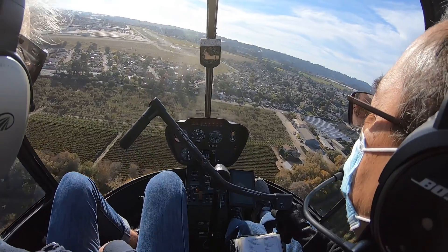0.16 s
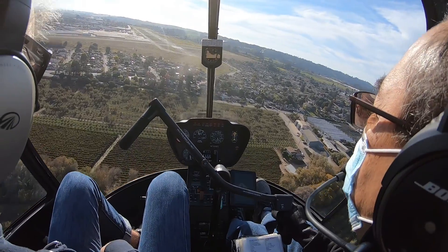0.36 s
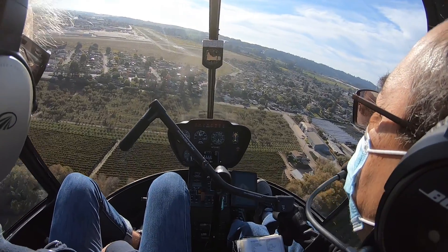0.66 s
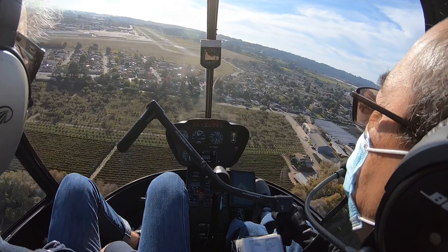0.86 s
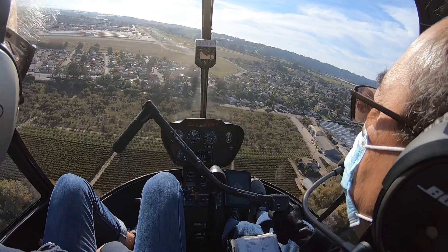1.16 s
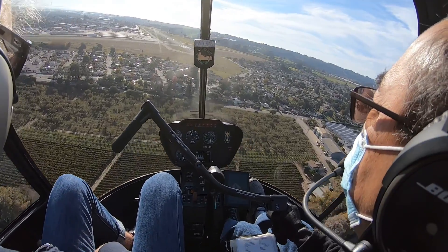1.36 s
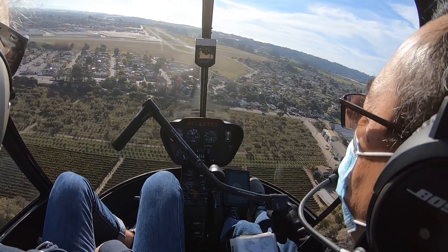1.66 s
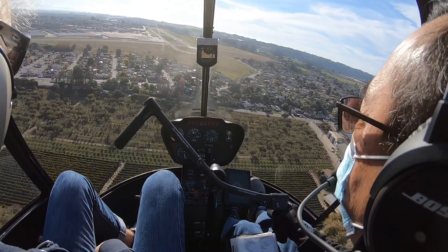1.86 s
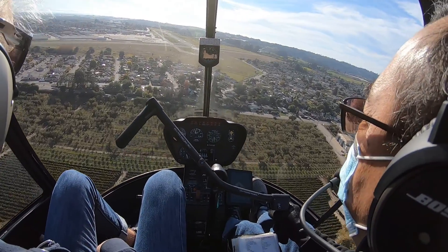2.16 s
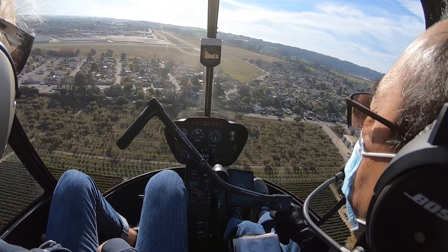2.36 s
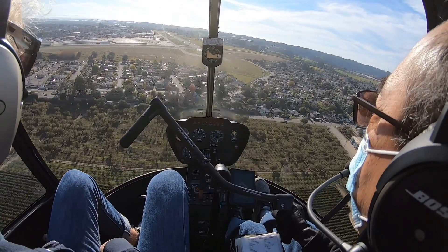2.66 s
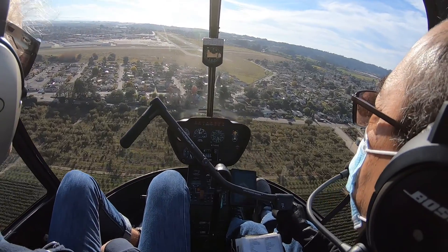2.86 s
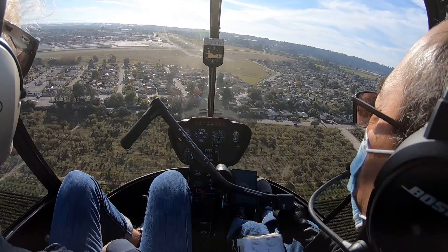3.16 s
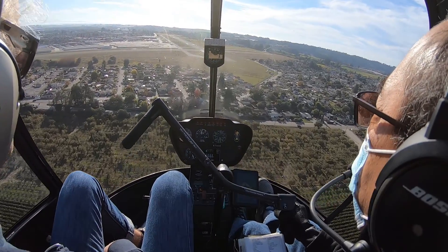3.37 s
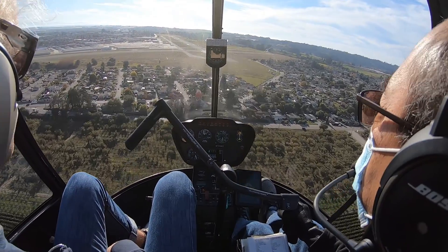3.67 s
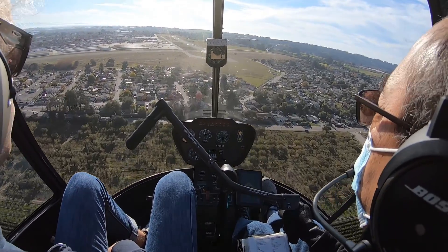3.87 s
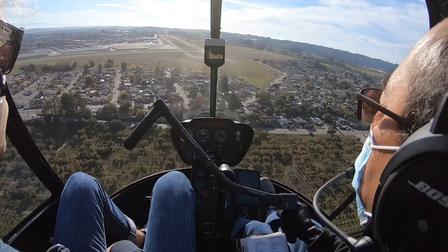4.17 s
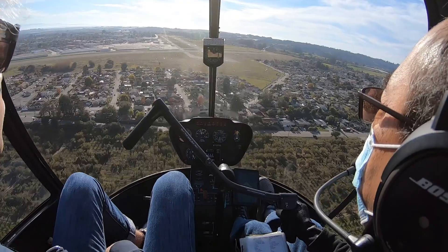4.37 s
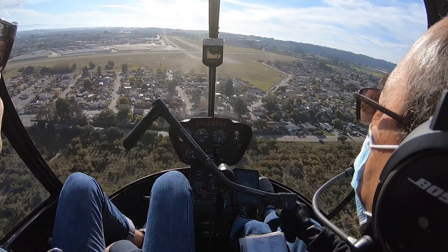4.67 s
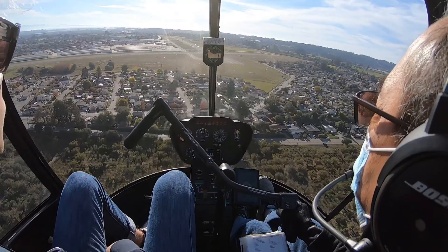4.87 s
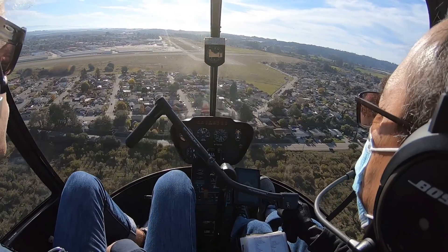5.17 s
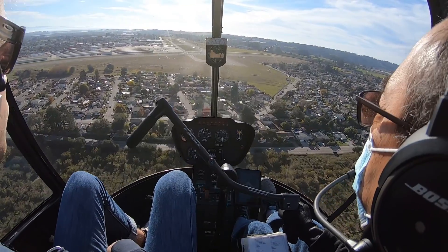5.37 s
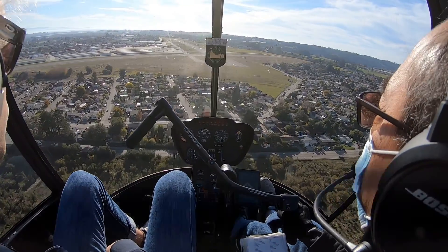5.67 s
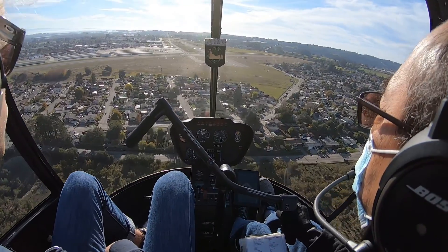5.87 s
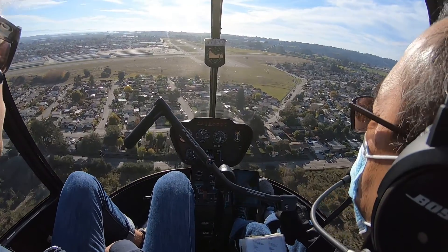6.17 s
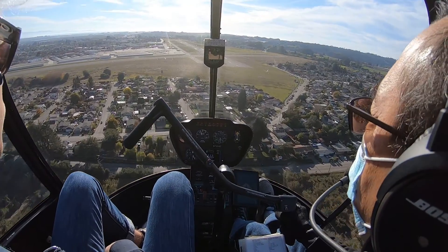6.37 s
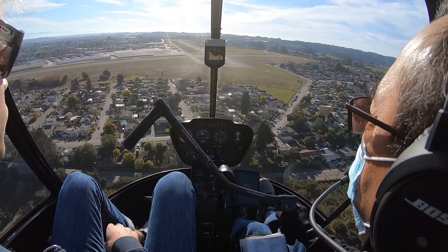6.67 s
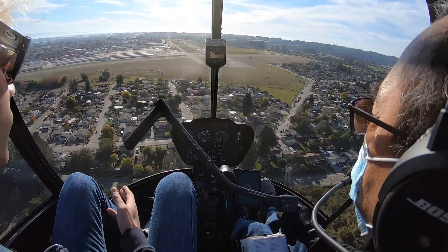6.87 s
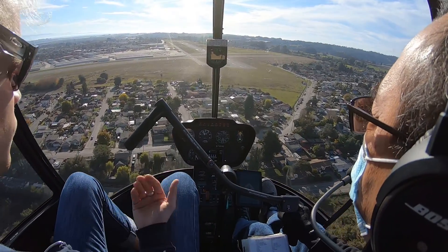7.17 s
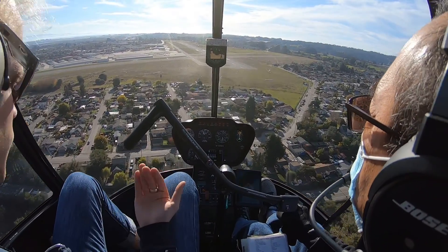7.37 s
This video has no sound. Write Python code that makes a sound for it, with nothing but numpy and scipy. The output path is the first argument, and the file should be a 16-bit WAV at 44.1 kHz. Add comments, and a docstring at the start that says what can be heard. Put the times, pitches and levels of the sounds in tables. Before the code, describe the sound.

A rapid, regular helicopter chop comes through a headset intercom: uneven snapping blade slaps, each with a short cabin reverberation, over coloured air rush and buzzing engine and tail rotor hum. It begins boomy and hollow, briefly softens to rushing air, then resumes clearer and brighter with occasional extra-hard thumping cracks. The pulsing continues steadily to the end, mid-heavy and clipped, in the left channel with the right practically silent.

```python
"""Two-bladed helicopter through a headset

Inside a small piston helicopter rolling out of a turn, heard through the headset intercom.
Each blade slaps the wake of the other, made of short pulses of uneven strength that echo round the cabin.
Blade swish and cabin rush are coloured noise; engine and tail rotor hum are sums of sine waves.
A second microphone is open at first. The left channel carries it all; the right has a very faint noise
floor and a trace of the left."""
import sys
import numpy as np
from scipy import signal
from scipy.fft import rfft, irfft, next_fast_len
from scipy.io import wavfile
from scipy.ndimage import map_coordinates

SR = 44100
rng = np.random.default_rng(int(sys.argv[2]) if len(sys.argv) > 2 else 0)


def dump_mix(stems):
    """Bounce the given channels to the path in sys.argv[1] as a 16-bit WAV at rate SR."""
    frames = np.atleast_2d(stems).T  # one column per channel
    limited = np.clip(frames, -1, 1)  # hard clip at full scale
    pcm = np.round(limited * 32767).astype(np.int16)
    wavfile.write(sys.argv[1], SR, pcm)


N = 331746

# speed of the air round the cabin, as the rush it makes before each sound's own offset: t/s, level/dB
AIR_RUSH = [(0, -34), (0.45, -33), (1.0, -34.5), (1.4, -28), (1.85, -30.5), (2.3, -29), (2.55, -33.5),
            (3.1, -33.5), (3.9, -32.5), (6.9, -32), (7.25, -30), (7.5, -31)]
# how hard the blades meet the wake, which they clear briefly as the turn ends:
# t/s, slap level/dB, lead of the second blade over the first/dB
WAKE_STRENGTH = [(0, -1.5, 4), (0.35, -2.5, 8), (0.65, -1.5, 0.5), (1.05, -2, 0), (1.27, -23, -3),
                 (1.45, -23, -5), (1.65, -1.5, -0.5), (2.2, -3, -1.5), (2.5, 0, 0.5), (3.35, -2, 4.5),
                 (4.3, 0, 3.5), (4.55, -3, 1), (5.1, -1, 1.5), (5.6, -3, 11.5), (5.9, -2.5, 0),
                 (6.2, -1, 9), (7.05, -3, -1), (7.5, -1, 1)]
# colour of the brighter cabin echoes: f/Hz, relative level per Hz/dB
ECHO_COLOUR = [(120, -39), (300, -30.5), (700, -11), (1200, -7), (1900, -0.5), (2700, -2), (4000, -16.5),
               (5500, -29), (7300, -37), (15000, -40)]


def amp(db):
    """Turn decibels into a gain."""
    return 10 ** (np.asarray(db) / 20)


def unit(x):
    """Scale a sound to rms 1."""
    return x / np.sqrt(np.mean(x ** 2) + 1e-20)


def curve(rows, at=None, axis=1):
    """Read one column of a table at the given times (default: every sample)."""
    rows = np.asarray(rows, float)
    times = np.arange(N) / SR if at is None else at
    return np.interp(times, rows[:, 0], rows[:, axis])


def gains(points, size):
    """Turn a table of frequencies and decibels into a gain for each FFT frequency."""
    hz, db = np.transpose(points)
    grid_hz = np.fft.rfftfreq(size, 1 / SR)
    return amp(np.interp(np.log(grid_hz + 1), np.log(hz), db))


def noise(points):
    """Random noise of rms 1, coloured by filtering its spectrum."""
    size = next_fast_len(N + 8192)
    spectrum = rfft(rng.standard_normal(size)) * gains(points, size)
    return unit(irfft(spectrum, size)[:N])


def wobble(rate):
    """A smooth random curve through `rate` random points a second."""
    points = rng.standard_normal(int(N * rate / SR) + 4)
    return map_coordinates(points, [np.arange(N) * rate / SR])


def pulses(times, sizes, points, skew=1, size=2048, count=256):
    """Pressure pulses of given spectrum and peak sizes; skew 1 rings only afterwards, 0 is symmetric."""
    # weighting the two halves of the cepstrum (spectrum of the log spectrum) sets where the pulse rings
    cepstrum = irfft(np.log(gains(points, size)))
    cepstrum[1:size // 2] *= 1 + skew
    cepstrum[size // 2 + 1:] *= 1 - skew
    # leave `count` samples of room ahead of the peak
    shape = np.roll(irfft(np.exp(rfft(cepstrum))), count)
    index = np.clip(np.round(np.ravel(times) * SR).astype(int), 0, N)
    train = np.bincount(index, np.ravel(sizes), N + 1)[:N]
    return signal.fftconvolve(train, shape / np.abs(shape).max())[count:count + N]


def rotor_phase():
    """Blade passes counted since the first one, for every sample, as the governor lets the speed drift."""
    # how far the blades fall behind steady turning: t/s, lag/ms
    blade_lag = [(0, -0.3), (0.45, -1.95), (1.3, -1.85), (1.65, 0.4), (2.3, 2.8), (2.81, 3.75), (3.3, 2.8),
                 (4.5, -1.25), (5.8, -1.3), (6.8, -0.8), (7.5, 2.6)]
    blade_hz, first_pass_s = 17.55, .0166
    return (np.arange(N) / SR - first_pass_s - curve(blade_lag) / 1000) * blade_hz


def blade_passes(phase, scatter_db=1.23):
    """Time and strength of each slap; the two blades differ in strength and are not quite evenly spaced."""
    # single passes that slap harder, or in one case softer: t/s, extra slap level/dB
    odd_slaps = [(0.87, 2), (2.41, 5), (2.93, 1.5), (3.27, 2.5), (3.72, 6), (3.84, -1.5), (4.40, 0.5),
                 (4.75, 6.5), (5.31, 2), (5.66, 1.5), (5.77, 4), (6.11, 3), (6.91, 3.5)]
    number = np.arange(int(phase[-1]) + 1)
    second_blade = number % 2 == 1
    even_times = np.interp(number, phase, np.arange(N) / SR)
    times = even_times + np.where(second_blade, .0002, -.00054)
    # share the lead equally: half up for the second blade, half down for the first
    lead_db = np.where(second_blade, .5, -.5) * curve(WAKE_STRENGTH, times, axis=2)
    db = curve(WAKE_STRENGTH, times) + lead_db
    for s, extra_db in odd_slaps:
        nearest = np.argmin(np.abs(times - s))
        db[nearest] += extra_db
    return times, amp(db + scatter_db * rng.standard_normal(len(times)))


def cabin_rush(rush_db=5.5):
    """Airflow and machinery noise in the cabin, as noise that follows the speed of the air."""
    # colour of the cabin noise: f/Hz, relative level per Hz/dB
    cabin_colour = [(50, -21), (120, -34), (200, -13), (330, -13), (560, -4), (760, -0.5), (1200, -1),
                    (1900, 3), (3000, -2.5), (4000, -8), (5500, -15), (7500, -29.5), (10000, -32),
                    (15000, -52)]
    return amp(curve(AIR_RUSH) + rush_db) * noise(cabin_colour)


def hum(turns, orders, waver=0.31, drift=0.43):
    """Harmonics of a shaft geared to the rotor, each wavering a little in level and phase."""
    out = np.zeros(N)
    for order, db in orders:
        angle = 2 * np.pi * (round(order) * turns + rng.random()) + drift * wobble(7.7)
        level = amp(db) * (1 + waver * np.tanh(wobble(7.1)))
        out += level * np.sqrt(2) * np.sin(angle)
    return out


def machinery(phase, tail_db=0):
    """Engine and tail rotor hum together, both geared to the main rotor."""
    # engine hum before the mix: multiple of the crank rate, rms level/dB
    engine_orders = [(4, -60.5), (5, -62.5), (6, -49), (7, -53.5), (8, -51), (10, -56), (11, -65),
                     (12, -51)]
    # tail rotor hum before the mix: multiple of the tail blade rate, rms level/dB
    tail_orders = [(1, -78), (2, -53), (3, -45.5), (4, -50), (5, -48)]
    crank_ratio, tail_ratio = 2.506, 6.42  # crank turns and tail blade passes for each main blade pass
    return hum(crank_ratio * phase, engine_orders) + amp(tail_db) * hum(tail_ratio * phase, tail_orders)


def second_microphone(phase, hum_db=-7):
    """Another headset adds boomier cabin noise and machinery hum until its squelch shuts."""
    # cabin noise in this microphone: t/s, level/dB
    open_level = [(0, -28), (1.1, -29), (1.35, -27), (1.6, -23), (1.625, -70), (1.7, -120)]
    # colour of that noise: f/Hz, relative level per Hz/dB
    boomy_colour = [(60, -44), (125, -28), (175, -7), (250, 1), (295, -4.5), (355, 6.5), (550, -7),
                    (1100, 0), (1800, -18), (3100, -6), (4100, -7), (5500, -24), (9000, -43)]
    pickup = noise(boomy_colour) + amp(hum_db) * unit(machinery(phase, tail_db=-4.0))
    return amp(curve(open_level)) * pickup


def swish(phase, depth_db=22, width=0.18, late=0.12, gust_db=0.18, grain_db=1.06):
    """Turbulence on the advancing blade swells and fades once a pass, and rises with the rush of air."""
    # colour of the swish: f/Hz, relative level per Hz/dB
    swish_colour = [(300, -23.5), (800, 1), (1500, 4), (2500, 3.5), (3500, 1), (5000, -8.5), (7200, -11),
                    (8500, -18), (12000, -19.5), (15500, -41)]
    steady_rush_db, swish_db, growth = -32, -19.5, 1  # growth: dB of swish for each dB of rush
    # width and late are fractions of a blade pass
    offset = (phase - late + .5) % 1 - .5
    swell_db = depth_db * (np.exp(-.5 * (offset / width) ** 2) - 1)
    eddies_db = gust_db * wobble(18) + grain_db * wobble(300)
    flow_db = growth * (curve(AIR_RUSH) - steady_rush_db)
    return amp(swish_db + flow_db + swell_db + eddies_db) * noise(swish_colour)


def echoes(times, strength, paths, colour, scatter=0.62, jitter_ms=0.034):
    """Each slap returns along the cabin's short paths, never quite alike."""
    delay_ms, gain = np.transpose(paths)
    shift, size = rng.standard_normal((2, len(times), len(gain)))
    arrivals = times[:, None] + (delay_ms + jitter_ms * shift) / 1000
    return pulses(arrivals, strength[:, None] * gain * (1 + scatter * size), colour)


def cabin_echoes(times, strength, banked_db=2, level_db=3.5, dull_share=0.14):
    """In the bank the echoes are hollow; once level they are brighter, each slap in its own shade."""
    # paths off canopy, floor and doors, in the bank and once level: delay/ms, signed gain before the mix
    banked_paths = [(1.09, 0.29), (1.72, -0.14), (2.22, 0.26), (5.33, 0.23), (6.19, -0.19), (7.37, -0.26),
                    (7.89, -0.17), (8.37, -0.24), (9.18, -0.27), (9.77, -0.16), (10.63, 0.13),
                    (11.13, -0.21)]
    level_paths = [(1.97, -0.11), (2.31, 0.17), (4.26, 0.09), (4.67, -0.13), (5.19, -0.19), (6.26, -0.11),
                   (6.49, 0.13), (7.1, 0.13), (7.48, -0.12), (7.91, -0.29), (8.37, -0.2), (9.23, -0.21),
                   (10.5, -0.17), (11.16, -0.11), (11.59, 0.13), (11.97, -0.08)]
    # a lone late echo off the cabin's far end: delay/ms, signed gain
    far_path = [(11.8, 0.13)]
    # colours of the hollow echoes and the far one: f/Hz, relative level per Hz/dB
    dull_colour = [(120, -57), (300, -23), (580, 0), (720, 5.5), (1000, 5.5), (1800, 5.5), (2700, -3.5),
                   (4000, -8), (8000, -43), (15000, -43)]
    far_colour = [(120, -46), (560, -13), (730, 1), (1300, 1.5), (2200, -22), (8000, -68)]
    banked = times < 1.4  # seconds
    shade = dull_share * rng.standard_normal(len(times))
    hollow = echoes(times, strength * banked, banked_paths, dull_colour)
    bright = echoes(times, strength * ~banked * (1 - shade), level_paths, ECHO_COLOUR)
    dull = echoes(times, strength * ~banked * shade, level_paths, dull_colour)
    far = echoes(times, strength, far_path, far_colour, scatter=0.32)
    return amp(banked_db) * hollow + amp(level_db) * (bright + dull) + far


def cabin_ring(times, strength, ring_db=-20, build=0.0058, t60=0.065, scatter_db=1):
    """Later echoes merge into a short burst of noise after each slap."""
    # build and t60 (time to fade by 60 dB) are in seconds
    t = np.arange(SR // 10) / SR
    burst = (1 - np.exp(-(t / build) ** 2)) * amp(-60 * t / t60)
    sizes = strength * amp(scatter_db * rng.standard_normal(len(times)))
    train = np.bincount(np.round(times * SR).astype(int), sizes, N)
    envelope = signal.fftconvolve(train, burst / burst.max())[:N]
    return amp(ring_db) * envelope * noise(ECHO_COLOUR)


def shifting_colour(x, depth_db=2.0, per_octave=3.192, rate=17.5, order=512):
    """The sound's paths keep changing: bands trade energy while each moment's total stays."""
    hz, t, z = signal.stft(x, SR, nperseg=order)
    octaves = np.log2(1 + hz / 400)
    # a smooth random field over pitch and time
    knots = np.diff(rng.standard_normal((40, 400)), axis=1) / np.sqrt(2)
    grid = np.meshgrid(octaves * per_octave, t * rate, indexing="ij")
    field = map_coordinates(knots, grid, mode="mirror")
    tinted = z * amp(depth_db * 2 * np.tanh(field / 2))
    tinted *= np.linalg.norm(z, axis=0) / (np.linalg.norm(tinted, axis=0) + 1e-12)
    return signal.istft(tinted, SR, nperseg=order)[1][:N]


def thud(times, strength, thud_db=-49.5, growth=3.1):
    """A low thud from the overloaded intercom, growing much faster than the slap: only hard ones boom."""
    # colour of the overload thud: f/Hz, relative level per Hz/dB
    thud_colour = [(30, 5), (130, 1), (300, -18), (800, -45), (4000, -100)]
    return -amp(thud_db) * pulses(times, strength ** growth, thud_colour)


def slap(times, strength, peak_db=5, skew=0.78, second_share=0.25, split_share=0.45, split_lead_db=1.5,
         edge_db=-19.0, edge_scatter_db=8):
    """A blade cracks through a wake vortex, then a weaker one; a weak first blade's crack splits in two."""
    # colours of the direct crack and of a steep-fronted slap's treble: f/Hz, relative level per Hz/dB
    crack_colour = [(100, -34.5), (250, -14.5), (520, -5.5), (920, 5), (1300, 2), (1800, 1), (2600, -4),
                    (4000, -10.5), (7000, -21), (9000, -40), (15000, -72)]
    steep_colour = [(500, -29), (3000, 15), (7000, 18), (15000, -29)]
    later = times + rng.uniform(.00036, .0006, len(times))
    first_blade = np.arange(len(times)) % 2 == 0
    split = split_share * first_blade * np.tanh(curve(WAKE_STRENGTH, times, axis=2) / split_lead_db)
    # the second pulse may add or, with a negative share, push the other way
    share = split + second_share * rng.standard_normal(len(times))
    crack = pulses([times, later], [strength, strength * share], crack_colour, skew)
    # a close cut through the vortex core steepens the front of the pulse
    sharpness = amp(edge_db + edge_scatter_db * np.tanh(rng.standard_normal(len(times))))
    steep_front = pulses(times, strength * sharpness, steep_colour)
    return amp(peak_db) * (crack + steep_front)


def scene(hum_db=-2, right_db=-70, floor_db=-68, scattered_db=0.57, spread=0.43):
    """All sound reaches the intercom as one signal on the left; the right has a noise floor and faint leak."""
    # colour of the very faint noise on the right: f/Hz, relative level per Hz/dB
    floor_colour = [(20, -5), (300, -18.5), (2000, -26), (15000, -27)]
    phase = rotor_phase()
    times, strength = blade_passes(phase)
    # the hardest slaps are beamed, so their echoes grow less than the direct crack
    indirect = np.minimum(strength ** spread, 2.1 * strength)
    scattered = cabin_echoes(times, indirect) + cabin_ring(times, indirect) + swish(phase)
    rotor = slap(times, strength) + thud(times, strength) + amp(scattered_db) * shifting_colour(scattered)
    headset = rotor + cabin_rush() + amp(hum_db) * machinery(phase) + second_microphone(phase)
    right = amp(right_db) * headset + amp(floor_db) * noise(floor_colour)
    return np.array([headset, right])


def record(dry):
    """The intercom overloads, rounding off the tallest spikes, then dulls the treble."""
    # the intercom's treble response: f/Hz, level/dB
    treble_response = [(7300, -1), (8400, -5.5), (12000, -8.5), (15500, -10)]
    ceiling, hardness = .94, 7  # a higher hardness bends more sharply at the ceiling
    clipped = dry / (1 + np.abs(dry / ceiling) ** hardness) ** (1 / hardness)
    size = next_fast_len(N + 8192)
    below_top = np.fft.rfftfreq(size, 1 / SR) < 15900  # Hz, nothing passes above
    passband = gains(treble_response, size) * below_top
    return irfft(rfft(clipped, size) * passband, size)[:, :N]


dry = scene()
out = record(dry)
dump_mix(out)
```